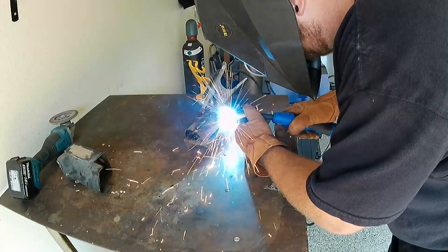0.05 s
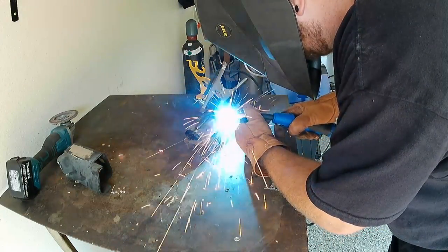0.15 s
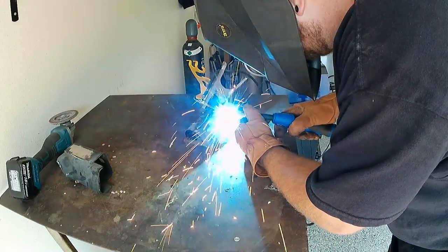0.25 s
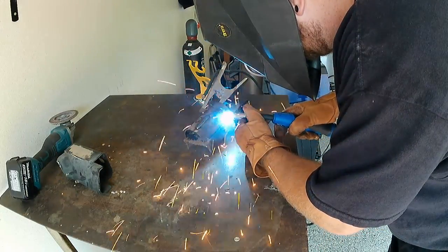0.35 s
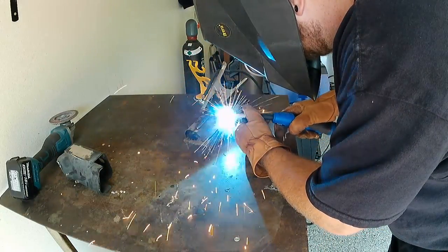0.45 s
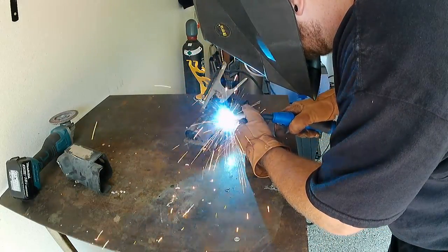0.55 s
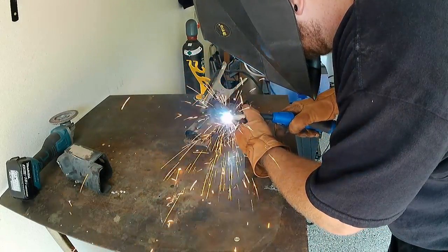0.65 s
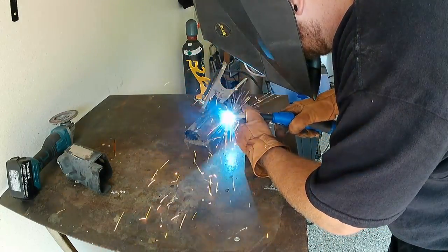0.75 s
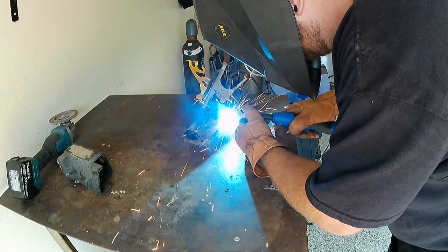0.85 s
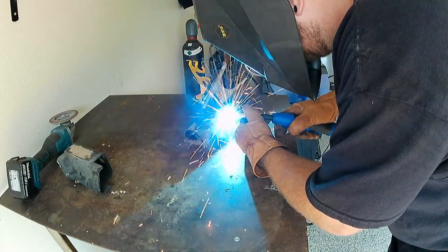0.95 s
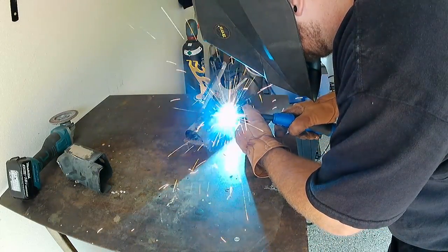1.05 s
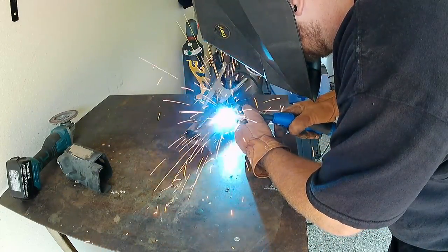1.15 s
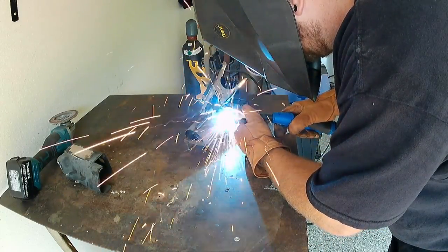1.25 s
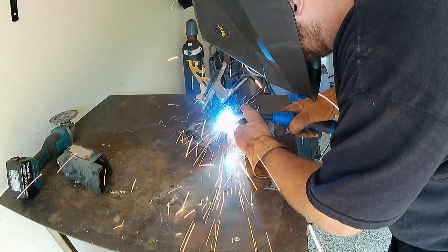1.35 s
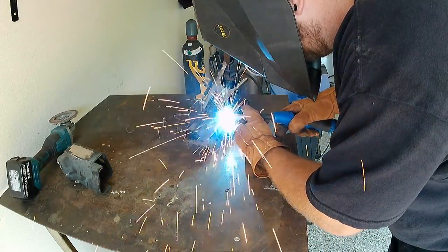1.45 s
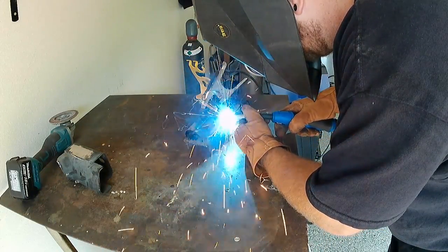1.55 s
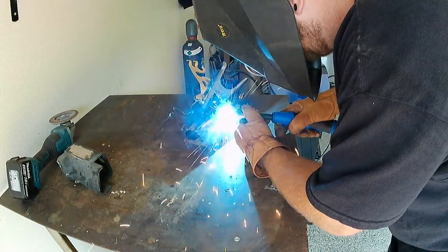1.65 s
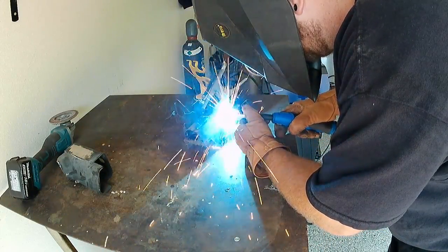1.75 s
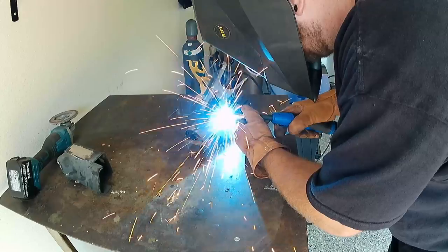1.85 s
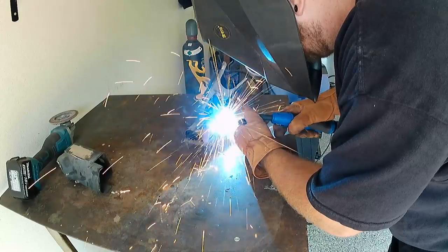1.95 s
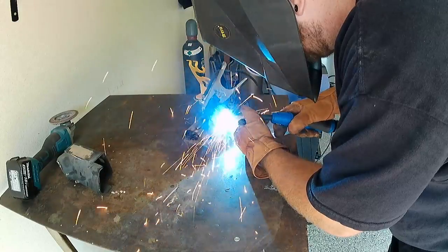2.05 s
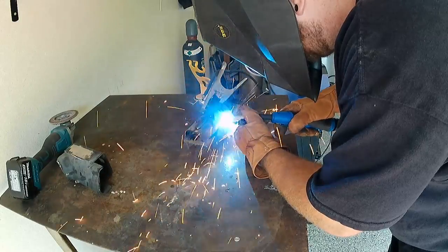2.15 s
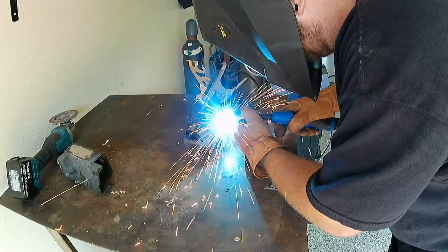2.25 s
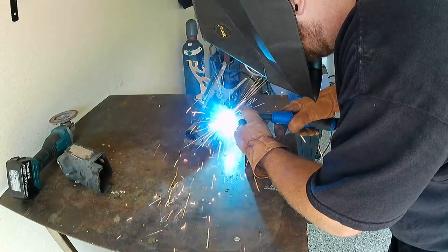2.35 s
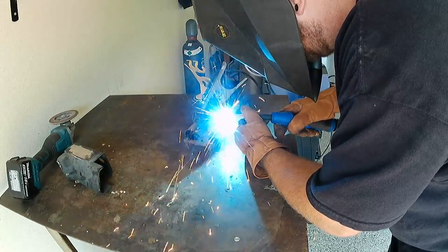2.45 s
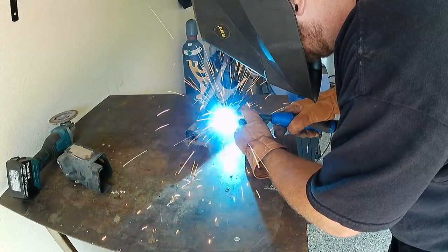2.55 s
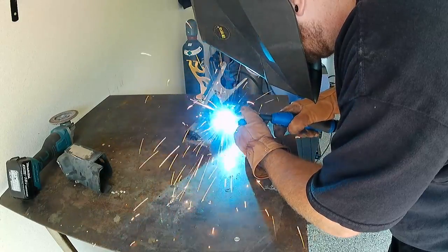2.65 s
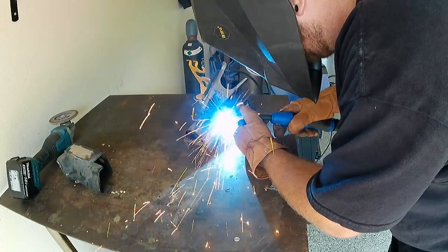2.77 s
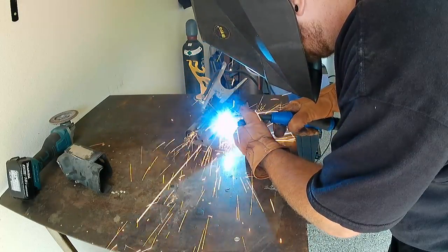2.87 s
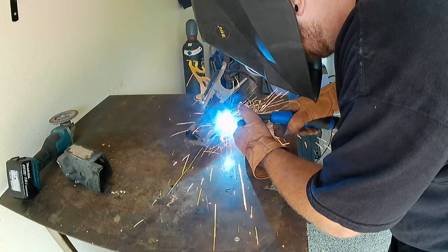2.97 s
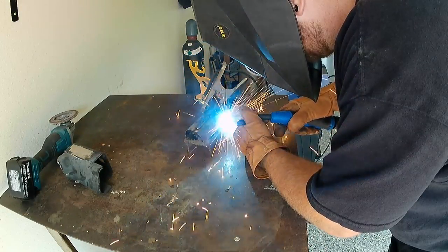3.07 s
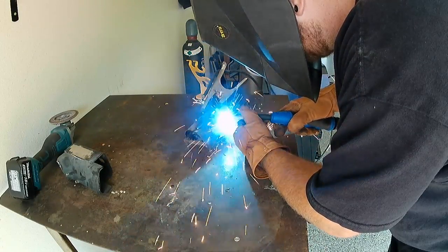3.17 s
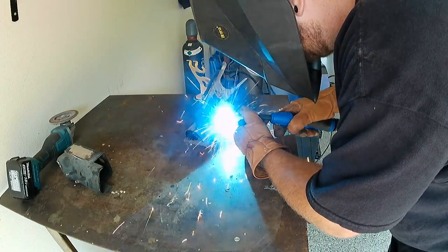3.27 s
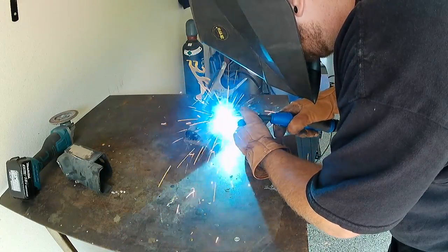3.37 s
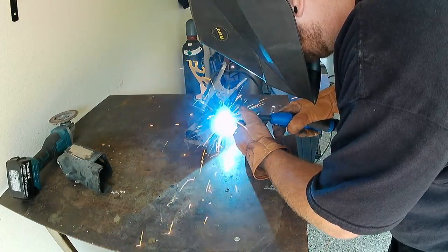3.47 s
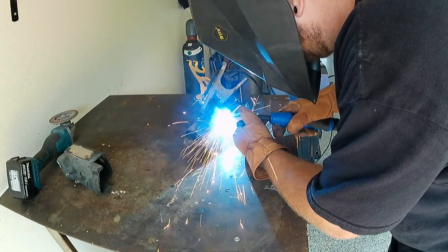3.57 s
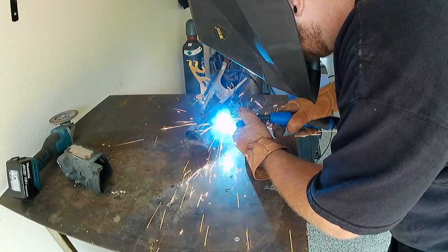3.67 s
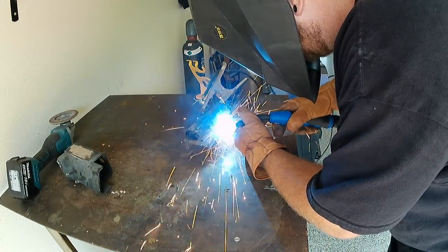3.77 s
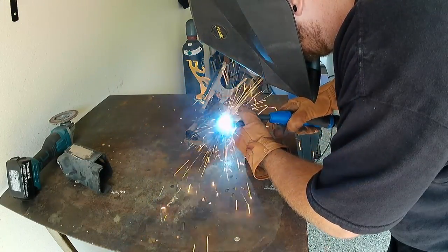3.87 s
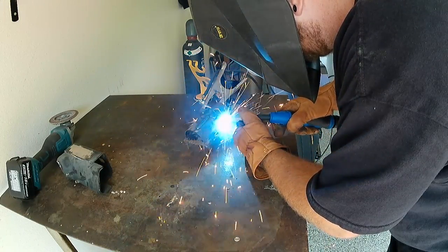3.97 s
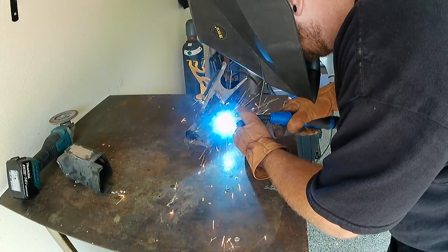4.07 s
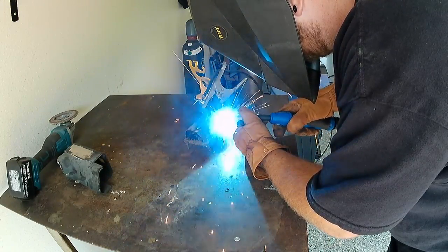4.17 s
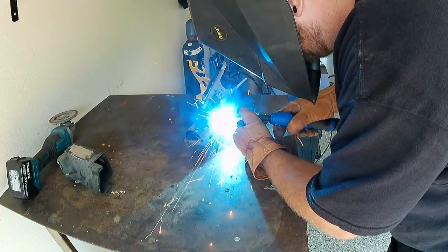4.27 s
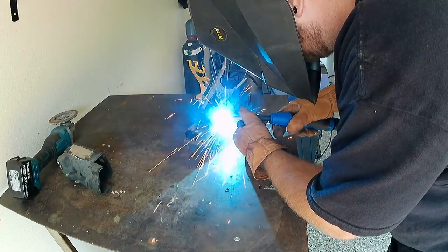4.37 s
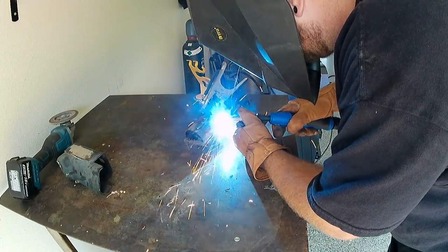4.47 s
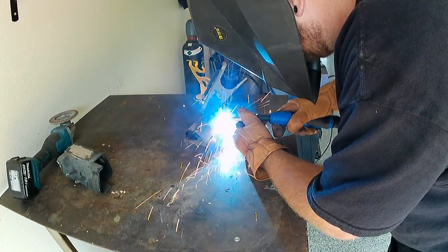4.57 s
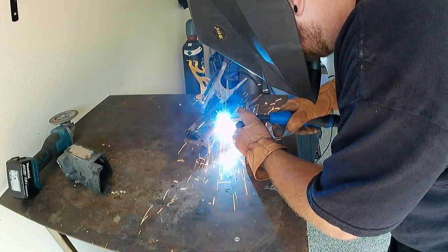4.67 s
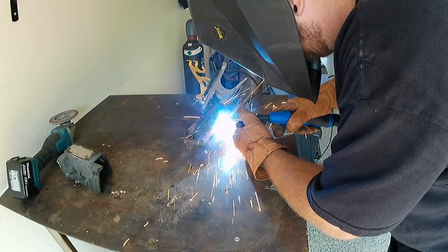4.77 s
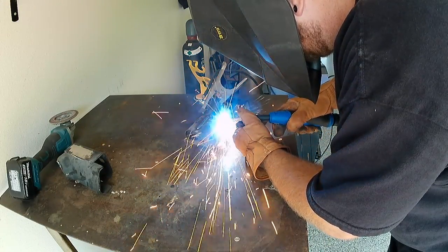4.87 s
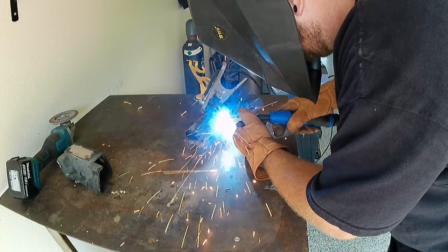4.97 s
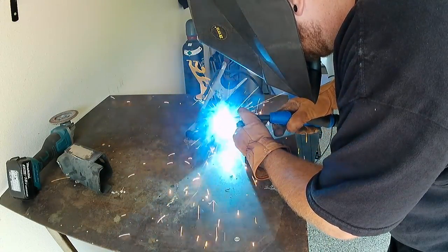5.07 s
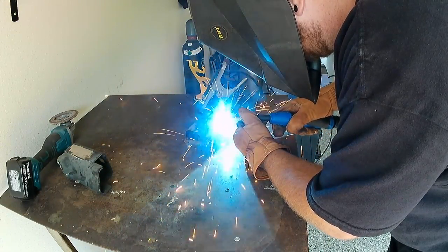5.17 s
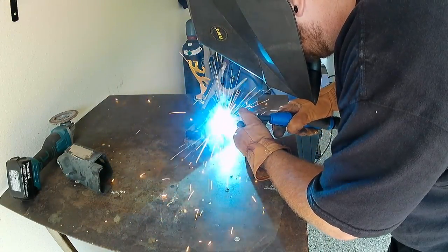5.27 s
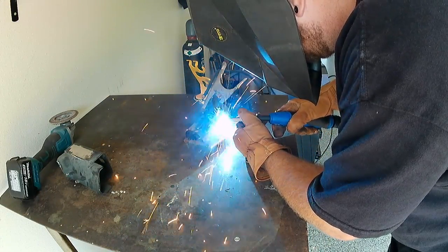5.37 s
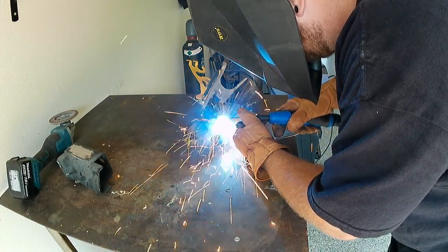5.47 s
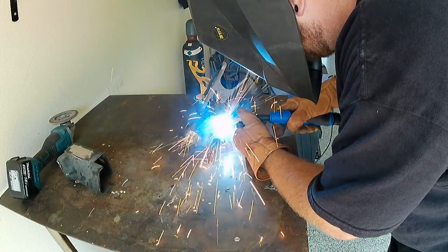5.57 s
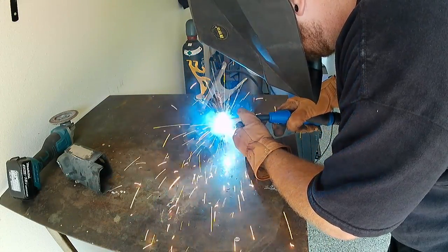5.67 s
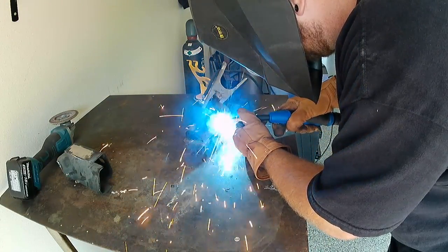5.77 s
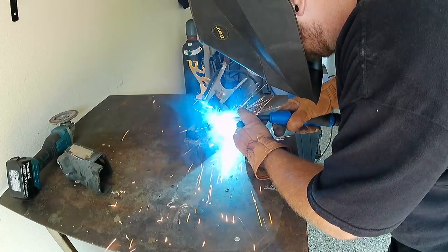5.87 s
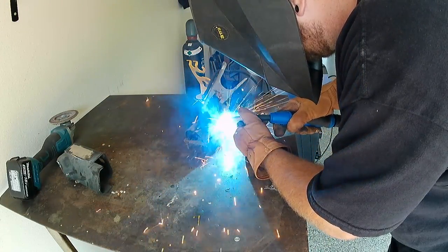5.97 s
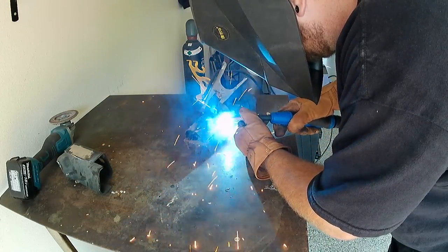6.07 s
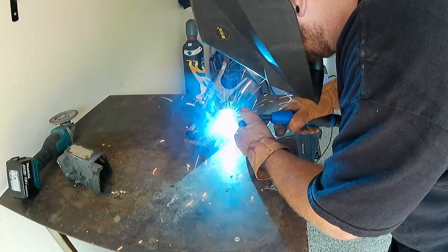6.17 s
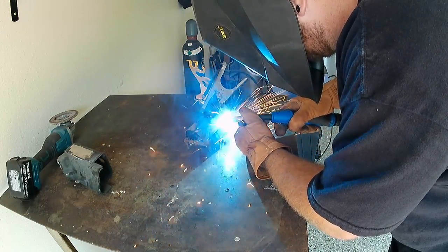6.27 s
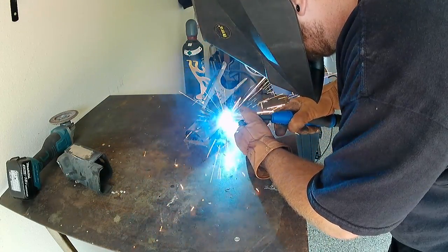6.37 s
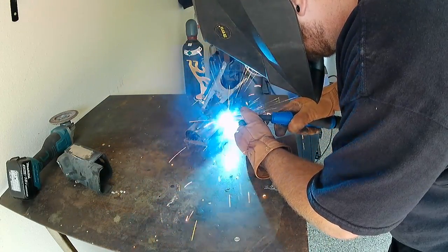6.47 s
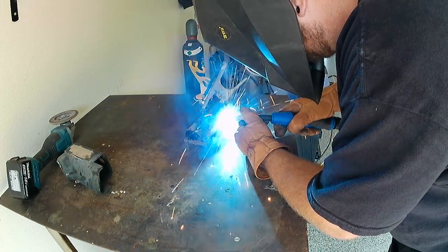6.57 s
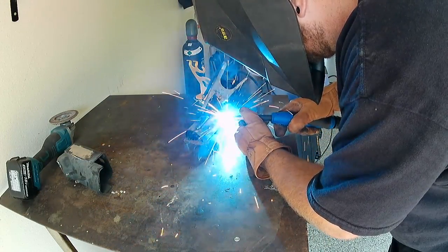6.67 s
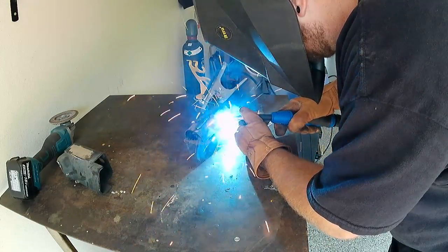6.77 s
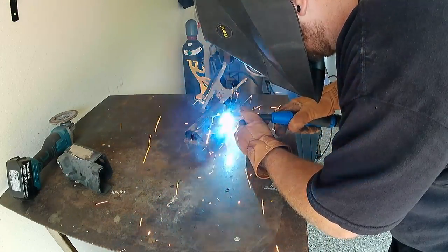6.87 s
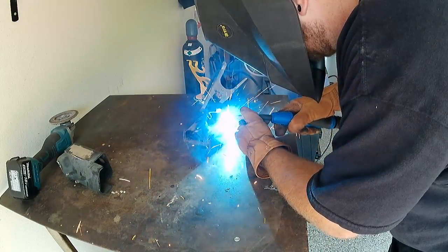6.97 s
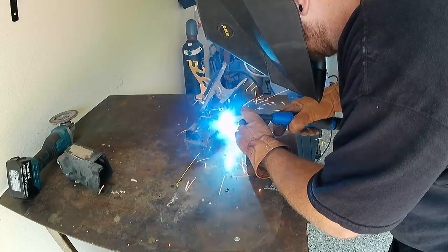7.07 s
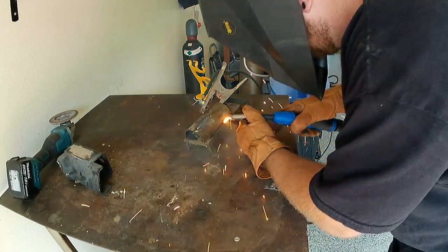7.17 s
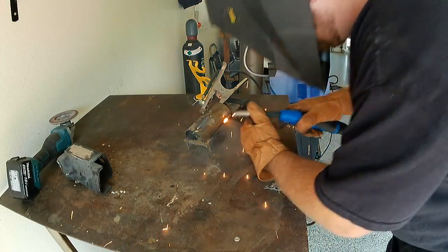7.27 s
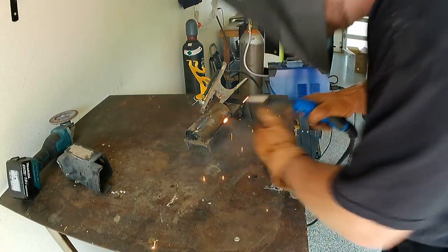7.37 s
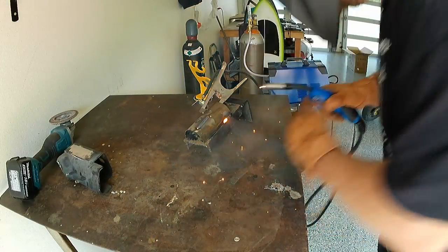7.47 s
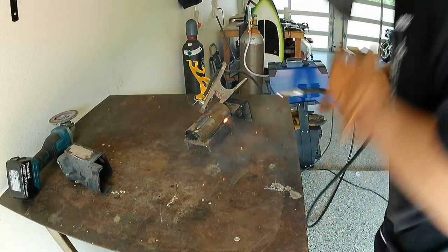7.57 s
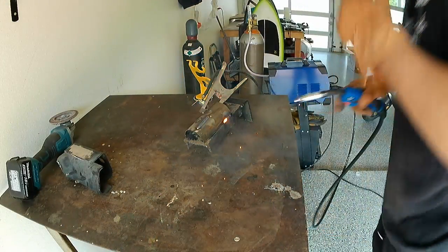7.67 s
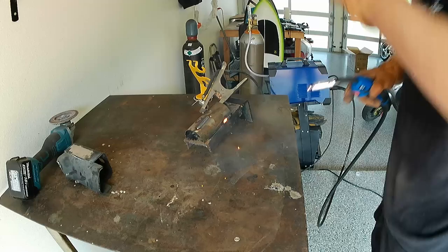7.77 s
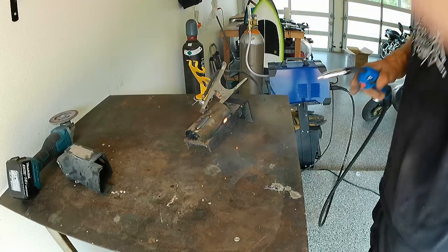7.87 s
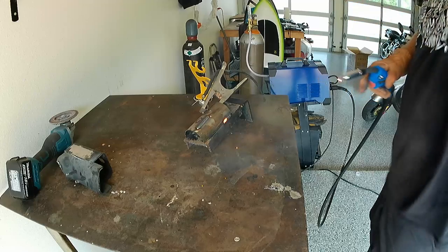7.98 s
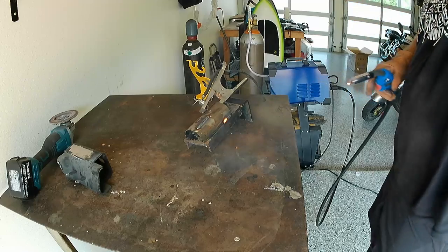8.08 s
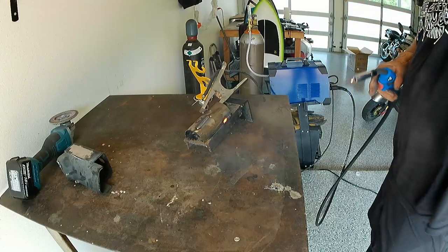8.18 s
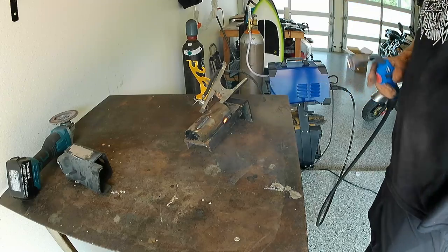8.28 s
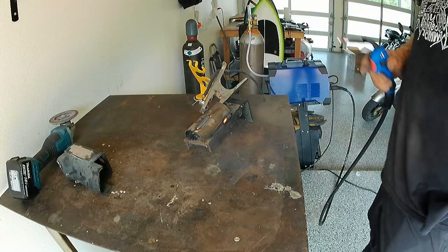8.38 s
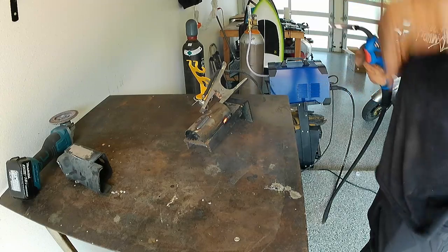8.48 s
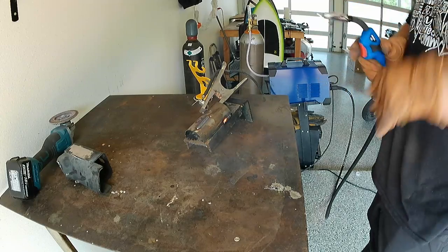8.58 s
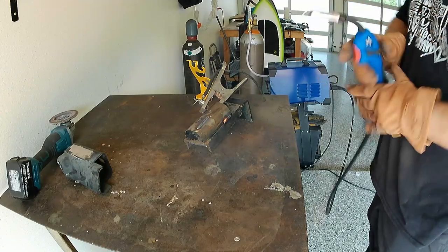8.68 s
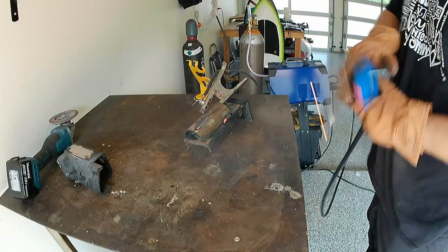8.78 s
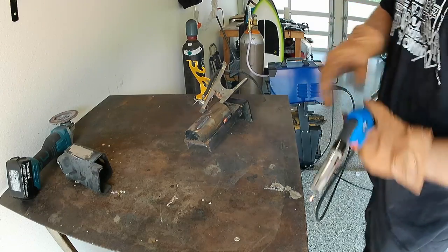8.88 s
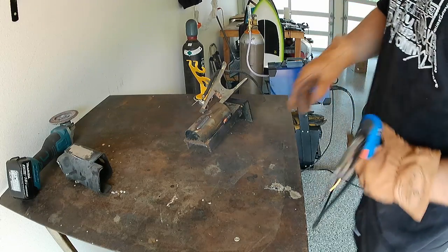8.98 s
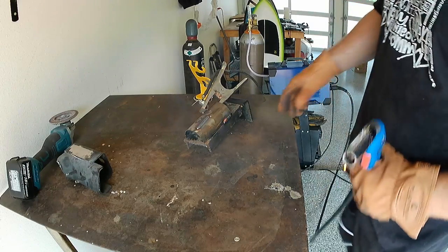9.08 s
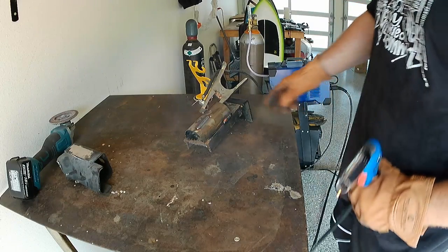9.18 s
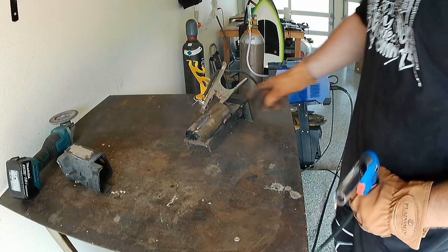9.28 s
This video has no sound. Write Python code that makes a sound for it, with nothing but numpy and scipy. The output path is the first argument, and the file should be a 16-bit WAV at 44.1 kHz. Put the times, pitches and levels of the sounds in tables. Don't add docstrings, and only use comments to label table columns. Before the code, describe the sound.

Loud, overloaded welding pops and sizzle on steel pipe, briefly interrupted near the start, finally cut off to a low fan and transformer hum.

```python
import sys
import numpy as np
from scipy import signal
from scipy.fft import rfft, irfft
from scipy.io import wavfile
from scipy.ndimage import uniform_filter1d

SR = 44100
rng = np.random.default_rng(int(sys.argv[2]) if len(sys.argv) > 2 else 0)


def dump(signal):
    limited = np.clip(np.atleast_2d(signal).T, -1, 1)
    pcm = np.round(limited * 32767).astype(np.int16)
    wavfile.write(sys.argv[1], SR, pcm)


def gain_from_db(level_db):
    decades = np.asarray(level_db, float) / 20
    return 10 ** decades


N = 411453


def colour(x, points, keep=False):
    hz, db = np.transpose(points)
    f = np.fft.rfftfreq(len(x), 1 / SR) + 1
    gain = gain_from_db(np.interp(np.log(f), np.log(hz), db))
    y = irfft(rfft(x) * gain, len(x))
    return y if keep else y / np.std(y)


def walk(rate_hz):
    size = int(SR / rate_hz)
    y = uniform_filter1d(uniform_filter1d(rng.standard_normal(N), size), size)
    return y / np.std(y)


def curve(rows):
    return np.interp(np.arange(N) / SR, *np.transpose(rows))


def restrikes():
    # first_s, last_s, gap_ms, strength_db
    droplet_runs = [(0.0077, 0.0957, 8.8, 2), (0.2422, 0.2604, 9.1, 11.5), (0.4764, 0.5163, 10.0, 1),
                    (0.532, 0.6298, 8.2, 0.7), (0.6513, 0.7146, 9.0, -4.5), (1.0753, 1.1289, 8.9, 9.5),
                    (2.2405, 2.2578, 8.7, -0.7), (3.0906, 3.1466, 7.0, -1), (3.809, 3.8435, 5.7, 0.5),
                    (3.8748, 3.9422, 7.5, -1), (3.9481, 4.003, 9.1, 0), (4.8704, 4.9096, 9.8, 2.3),
                    (5.5442, 5.5886, 7.4, 10), (5.5954, 5.603, 3.8, 0.5), (6.1812, 6.2282, 6.7, 6),
                    (6.6059, 6.6215, 7.8, 4.5), (6.7174, 6.7349, 4.4, 1),
                    (0.1014, 0.1525, 12.6, 7.5), (0.8045, 0.9463, 10.2, 4), (1.2498, 1.3906, 12.7, 4),
                   (1.413, 1.4956, 10.7, 1), (1.5073, 1.632, 12.3, 3.5), (1.9422, 2, 12.0, 7),
                   (2.1864, 2.2323, 12.0, 1.2), (2.2645, 2.392, 11.1, 0.3), (2.7655, 2.8378, 14.0, 3),
                   (2.88, 2.9297, 11.7, 7), (2.9455, 3.0767, 11.3, 1.2), (3.1614, 3.227, 11.4, 0.5),
                   (3.2502, 3.4167, 13.9, 5), (3.5313, 3.6062, 12.1, 7), (3.657, 3.6807, 11.6, 9.5),
                   (3.708, 3.7976, 12.9, 3.5), (4.015, 4.2702, 12.9, 1.5), (4.4846, 4.6522, 11.8, 2.5),
                   (4.9195, 4.9883, 13.2, 2.5), (4.9978, 5.0993, 10.1, 3.5), (5.4148, 5.5094, 13.0, 6.5),
                   (5.6112, 5.7555, 11.2, 4.5), (5.7741, 5.8952, 12.4, 4.5), (6.244, 6.296, 10.1, 3.5),
                   (6.938, 6.9952, 13.9, 4),
                    (0.1683, 0.235, 16.6, 8.5), (0.7224, 0.79, 17.3, 7), (0.951, 1.0601, 17.6, 11),
                 (1.1733, 1.2266, 19.0, 8.5), (1.6484, 1.7535, 17.0, 7), (1.7886, 1.86, 18.5, 8.5),
                 (1.864, 1.918, 16.7, 6), (2.0144, 2.1394, 18.0, 2), (2.4158, 2.5413, 17.4, 6),
                 (2.5728, 2.754, 18.1, 4), (3.434, 3.5232, 21.8, 6.5), (4.279, 4.3867, 15.5, 4),
                 (4.404, 4.477, 23.4, 4), (4.666, 4.716, 16.5, 4), (4.7372, 4.8567, 15.1, 5.5),
                 (5.1063, 5.1387, 17.0, 6), (5.1563, 5.2125, 27.9, 7.5), (5.2784, 5.3974, 20.2, 4),
                 (5.9298, 6.0146, 27.7, 9), (6.1164, 6.166, 24.4, 5.5), (6.308, 6.3691, 15.7, 0.5),
                 (6.3908, 6.4345, 14.1, 3.5), (6.4596, 6.586, 18.1, 3.5), (6.6363, 6.6997, 20.7, 0),
                 (6.7396, 6.7666, 16.0, 4.5), (6.7735, 6.866, 15.7, 3.5), (7.022, 7.061, 21.0, 3.5)]
    # time_s, strength_db
    snaps = [(0.4579, 8), (1.0425, 7), (1.4006, 7.5), (1.7878, 13.9), (1.978, 11), (2.033, 12.4),
             (2.1195, 10.5), (2.164, 9), (2.388, 4.5), (2.4017, 6.5), (2.5908, 10.6), (2.8368, 11),
             (2.859, 10.9), (2.9777, 8), (3.23, 6.5), (3.6242, 11.5), (3.8621, 4.5), (3.9055, 9),
             (4.1948, 9), (4.2752, 6.5), (5.1482, 9), (5.264, 8), (5.5524, 9), (5.872, 11.8), (5.9128, -2),
             (6.0455, 12), (6.1999, 11), (6.244, 11.5), (6.708, 9), (6.9146, 4.5)]
    # time_s, stall_ms, strength_db, follow_up_ms
    stalls = [(0.7539, 24, 6, 19.2), (.9853, 31, 7.5, 16.5), (1.0032, 7, 8.5, 7.3), (1.7018, 22, 6, 9.4),
              (1.741, 29, 12.5, 9.1), (2.4587, 27, 6.5, 9.9), (2.4936, 24, 9.5, 8.9), (2.5287, 26, 10, 9.5),
              (3.2923, 15, 8, 8.2), (3.3232, 23, 10, 26.7), (3.348, 7, 0.5, 7.7), (3.391, 19, 5.5, 8.8),
              (3.5035, 24, 7, 20), (4.2298, 20, 6.5, 6.8), (4.2504, 14, 2.5, 6), (4.7358, 20, 9.5, 5.6),
              (4.7693, 22, 11, 12), (4.7952, 10, 11.5, 15.7), (5.2978, 19, 9.5, 18.9),
              (5.3399, 23, 7, 18.9), (5.3853, 27, 6.5, 16), (5.4434, 14, 9.5, 6.9),
              (5.4837, 19, 11.5, 12.5), (6.4991, 22, 4.5, 12), (6.531, 20, 7, 18.3), (6.579, 30, 8.5, 6.7),
              (6.6594, 22, 10, 8.2), (.8905, 18, 9.5, 7.7), (.9305, 17, 11.5, 7.8), (3.7328, 15, 9.5, 16.4)]
    uneven, scatter_db, growth_db, follow_up_db = 0.07, 2.4, 1.0, -3.5

    runs = droplet_runs
    s, db = [], []
    for (first_s, last_s, gap_ms, run_db), chance in zip(runs, rng.standard_normal((len(runs), 2, 48))):
        count = max(round((last_s - first_s) * 1000 / gap_ms), 1)
        gaps = np.exp(uneven * chance[0, :count])
        progress = np.append(0, np.cumsum(gaps)) / gaps.sum()
        lateness = np.append(0, chance[0, :count])
        s += list(first_s + (last_s - first_s) * progress)
        db += list(run_db + scatter_db * chance[1, :count + 1] + growth_db * lateness)
    s, db = np.array(s), np.array(db)

    snap_s, snap_db = np.transpose(snaps)
    free = abs(s[:, None] - snap_s).min(axis=1) > 0.004
    stall_s, stall_ms, stall_db, follow_ms = np.transpose(stalls)
    after_ms = (s[:, None] - stall_s) * 1000
    free &= ~np.any((after_ms > 4 - stall_ms) & (after_ms < follow_ms + 4), axis=1)
    return (np.concatenate([s[free], snap_s, stall_s, stall_s + follow_ms / 1000]),
            np.concatenate([db[free], snap_db, stall_db, stall_db + follow_up_db]))


def front(edge_hz, size=2048):
    port_hz, port_q = 550, 0.7
    w = 1j * np.fft.rfftfreq(size, 1 / SR)
    bass_cut = -w ** 2 / (w ** 2 + w * port_hz / port_q + port_hz ** 2)
    return bass_cut / (1 + w / edge_hz) ** 2


def paths(rows, size=2048):
    f = np.fft.rfftfreq(size, 1 / SR)
    return sum(gain * np.exp(-2j * np.pi * f * (ms + 1) / 1000) for ms, gain in rows)


def pipe():
    # pitch_hz, level_db, t60_s
    modes = [(464, -42, 0.075), (657, -35, 0.14), (873, -32.5, 0.037), (1350, -42.5, 0.13),
             (1422, -31, 0.024), (1746, -52.5, 0.095)]
    age = (np.arange(4096) / SR - 0.0015).clip(0)
    return sum(gain_from_db(db) * np.sin(2 * np.pi * hz * age) * 1000.0 ** (-age / t60_s) for hz, db, t60_s in modes)


def garage():
    # start_ms, t60_s, level_db, top_hz
    tails = [
        (1.5, 0.073, -22, 7400),
        (5.5, 0.31, -36, 9000),
        (8.0, 0.68, -32.5, 2430),
    ]
    t, out = np.arange(SR // 2) / SR, 0
    for start_ms, t60_s, db, top_hz in tails:
        age = t - (start_ms + 1) / 1000
        lowpass = signal.butter(1, min(top_hz, 20000), fs=SR)
        noise = signal.lfilter(*lowpass, rng.standard_normal(len(t)))
        out = out + gain_from_db(db) * noise * (age > 0) * 1000.0 ** (-age / t60_s)
    return out


def arc():
    # time_s, sharp_share (0-1)
    torch = [(0, 0.66), (1, 1), (2.2, 0.94), (2.7, 0.79), (3.1, 0.86), (3.7, 0.7), (4.2, 0.94), (4.7, 0.6),
             (5.2, 0.78), (5.6, 0.32), (5.9, 0.72), (6.3, 0.78), (6.6, 0.89), (7.1, 0.76)]
    # delay_ms, gain (negative = inverted)
    echoes = [(-0.045, 2.18), (0.054, 0.58), (0.147, 3.85), (0.334, 1.71), (0.4, -0.65), (0.572, -0.55),
              (0.732, 0.64), (0.827, 0.49), (0.925, 0.59), (1.055, -0.41), (1.251, -0.37), (1.588, 0.34),
              (2.078, -0.29), (2.294, 0.35), (2.458, 0.92), (2.623, 0.48), (3.143, 0.33), (3.339, -0.46),
              (3.52, -0.54), (3.705, -0.5), (3.918, -0.3), (4.113, -0.4), (4.661, 0.33), (4.84, 0.5),
              (5.684, -0.38), (5.864, -0.38)]
    # delay_ms, gain
    room_paths = [(0, 4.9), (0.19, 1.26), (0.38, 0.17)]
    sharp_hz, dull_hz = 5520, 1940

    s, db = restrikes()
    jitter, scatter = rng.standard_normal((len(s), 2)).T
    at = np.round((s - 0.001 + 3e-5 * jitter) * SR).astype(int).clip(0)
    sharp = np.clip(np.interp(s, *np.transpose(torch)) + 0.13 * scatter, 0, 1)
    pops, far = 0, 0
    for share, edge_hz, gain_db in ((sharp, sharp_hz, 0.1), (1 - sharp, dull_hz, 3.0)):
        train = np.zeros(N)
        train[at] = share * gain_from_db(db + gain_db)
        pops = pops + signal.fftconvolve(train, irfft(front(edge_hz) * paths(echoes)))[:N]
        far = far + signal.fftconvolve(train, irfft(front(edge_hz) * paths(room_paths)))[:N]

    strikes = np.zeros(N)
    strikes[at] = gain_from_db(db)
    burst = signal.lfilter([1], [1, -np.exp(-1 / (0.003 * SR))], np.roll(strikes, 60))
    spit = signal.fftconvolve(burst * rng.standard_normal(N), irfft(front(11000) * paths(echoes[:6])))[:N]
    ring = signal.fftconvolve(strikes, pipe())[:N]
    turn = 1.2 * walk(1.5)
    room = sum(signal.fftconvolve(far * side, garage())[:N] for side in (np.cos(turn), np.sin(turn)))
    return pops + ring + gain_from_db(-39) * spit + gain_from_db(-7.5) * room


def gas():
    # time_s, level_db
    flow = [(0, -24.5), (.3, -59.5), (.4, -45), (.45, -39.5), (7.05, -40), (7.2, -63.5), (7.33, -50.5),
            (7.5, -55.5), (7.66, -54.5), (7.71, -70), (9.33, -68)]
    # freq_hz, level_db per Hz
    spectrum = [(1500, -18), (3500, -13), (5400, 0), (6500, -9), (8000, -20), (10300, -22), (16000, -30)]
    flicker_db = 1.2 * walk(30)
    return gain_from_db(curve(flow) + flicker_db) * colour(rng.standard_normal(N), spectrum)


def fizz():
    # on_s, off_s
    burning = [
        (0, .27),
        (.42, 7.075),
    ]
    level_db, fade_s = -40.5, 0.034
    spectrum = [(3000, -20), (7000, -3), (11000, 2), (13000, -7), (16000, -10)]  # Hz, dB
    t = np.arange(N) / SR
    lit = sum((t >= on_s) * np.exp(-(t - off_s).clip(0) / fade_s) for on_s, off_s in burning)
    flicker_db = 2.0 * walk(40)
    return gain_from_db(level_db + flicker_db) * lit * colour(rng.standard_normal(N), spectrum)


def machine():
    # pitch_hz, level_db, width_hz
    hum = [(30, -38.5, 1.9), (90, -40, 1.7), (150.7, -39, .9), (158.8, -52, 2.18), (221, -53, 3),
           (301.5, -59, 1.2), (452.2, -54, 1.5), (527.6, -51, 3), (602.9, -50.5, 1.5), (904.4, -60, 1.8),
           (1055, -59, 1.5), (1206, -59, 1.8)]
    # time_s, level_db
    load = [
        (0, -0.5),
        (1.5, -1.5),
        (2, -3.5),
        (3.9, -4),
        (4.3, 0),
        (9.33, 0.5),
    ]
    # freq_hz, level_db per Hz
    air = [(12, -43), (50, 2.5), (110, -4), (200, -7), (340, -13), (560, -7.5), (850, -13), (1700, -16),
           (3000, -28.5), (4500, -33), (5800, -33), (7000, -41), (16000, -45)]
    air_db = -39
    tones = 0
    for hz, db, width_hz in hum:
        phase = 2 * np.pi * np.cumsum(hz + width_hz * walk(12)) / SR
        wobble_db = 2.5 * walk(16)
        level = np.sqrt(2) * gain_from_db(db + wobble_db + curve(load))
        tones = tones + level * np.sin(phase + 2 * np.pi * rng.random())
    swell_db = 0.5 * walk(3)
    return tones + gain_from_db(air_db + swell_db) * colour(rng.standard_normal(N), air)


def rustle():
    centre_s, length_s, level_db, pitch_hz = 7.5, 0.18, -47.5, 2100
    spectrum = [(pitch_hz / 2, -14), (pitch_hz, 0), (pitch_hz * 1.46, -16), (16000, -40)]  # Hz, dB
    swell = np.exp(-((np.arange(N) / SR - centre_s) / length_s) ** 4)
    flicker_db = 2.0 * walk(25)
    return gain_from_db(level_db + flicker_db) * swell * colour(rng.standard_normal(N), spectrum)


def scene():
    # freq_hz, gain_db
    housing = [(170, -11), (280, -4), (450, -5), (1300, -1), (1750, 1.5), (1950, -6.5), (2900, -3.5),
               (3350, -7), (3900, 1), (8000, 1.5), (10300, 4), (13200, 3), (14800, 8.5), (15800, -0.5)]
    near = colour(arc() + gas() + fizz(), housing, keep=True)
    return (near + machine() + rustle())[None]


def smear_treble(x, size=1400):
    moments = [.65, 1.03, 1.41, 1.865, 1.93, 4.27, 4.61, 4.825, 5.145, 5.595, 6.105, 6.21, 6.278, 6.72,
               7.025, 7.28, 7.345, 7.39, 7.495, 7.73, 9.095]
    y, hz = x.copy(), np.fft.rfftfreq(size, 1 / SR)
    window, treble = np.hanning(size), hz > 1900
    for s in moments:
        at = int(s * SR) - size // 2
        frame = rfft(x[at:at + size] * window)
        power = uniform_filter1d(abs(frame) ** 2, size=4)
        floor = np.maximum(1.15 * uniform_filter1d(power, size=40), 0.04 * power[treble].max())
        weak = treble & (power < floor)
        kept = frame * treble * ~weak
        smear = irfft(abs(kept) * np.exp(2j * np.pi * rng.random(len(hz))), size) * window
        y[at:at + size] += 1.8 * smear - irfft(0.9 * frame * weak + 0.6 * kept, size)
    return y


def band_limit(x):
    return signal.sosfilt(signal.butter(12, 16770, fs=SR, output="sos"), x)


def record(dry):
    offset, top_hz = 0.0165, 15800
    flat = np.clip(dry + offset, -0.98, 0.98)
    cut = signal.sosfiltfilt(signal.ellip(10, 0.2, 45, top_hz, fs=SR, output="sos"), flat)
    return band_limit(np.clip(smear_treble(cut[0])[None], -1, 1))


dry = scene()
out = record(dry)
dump(out)
```